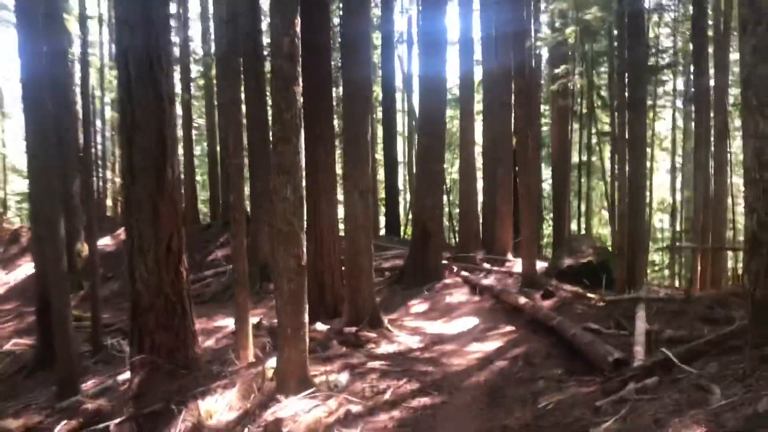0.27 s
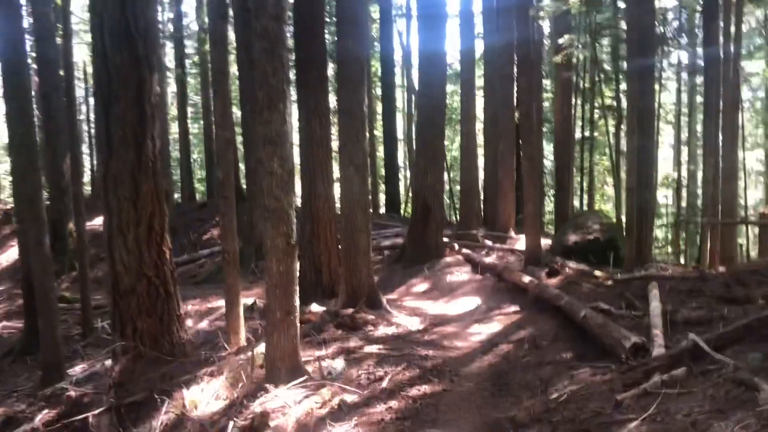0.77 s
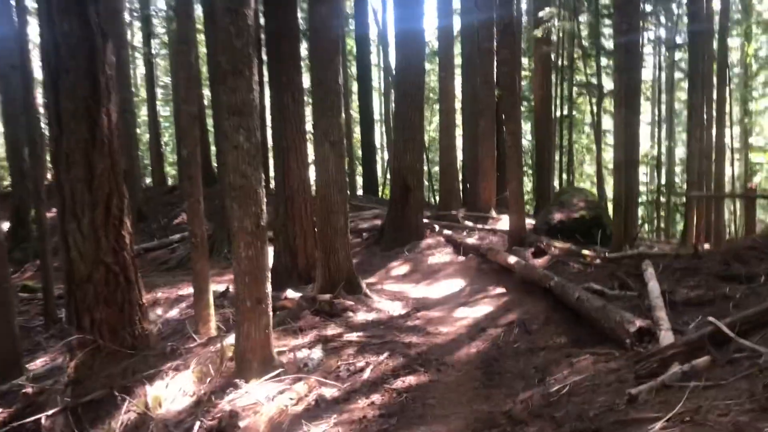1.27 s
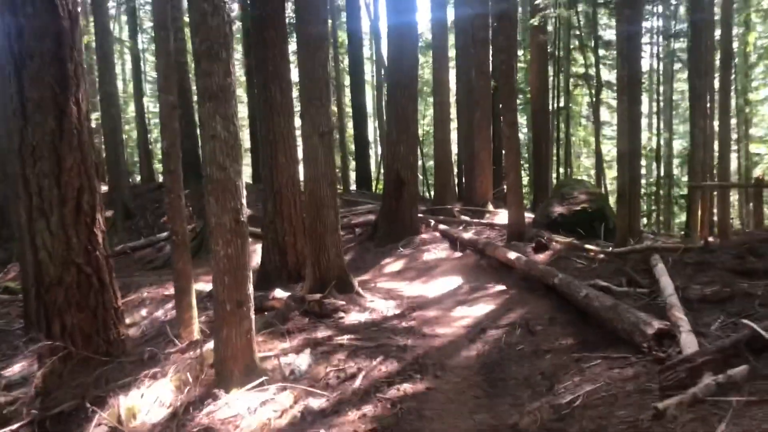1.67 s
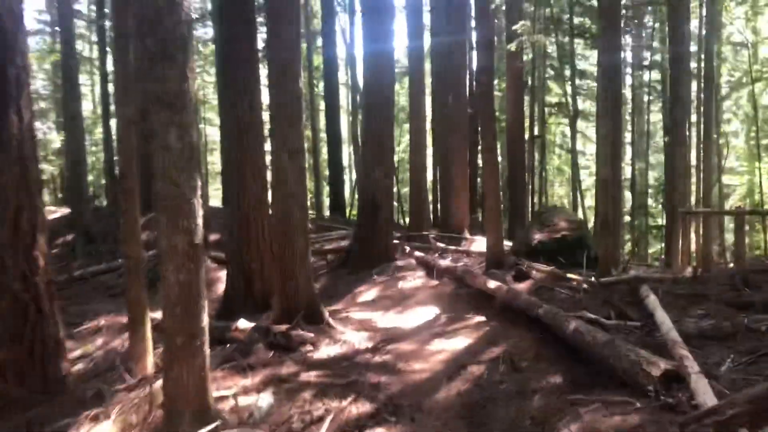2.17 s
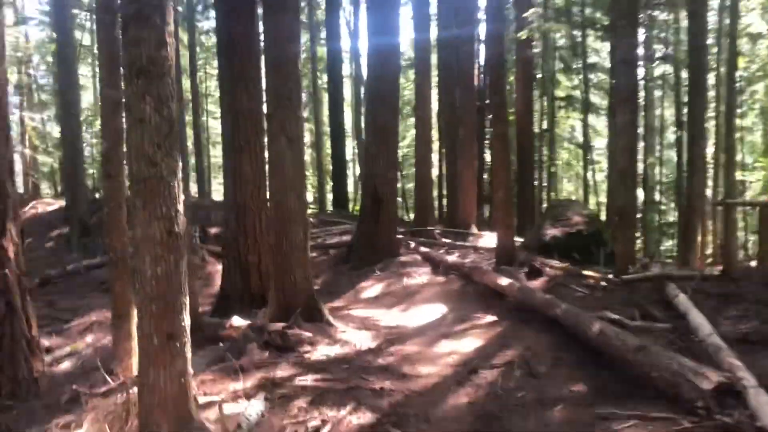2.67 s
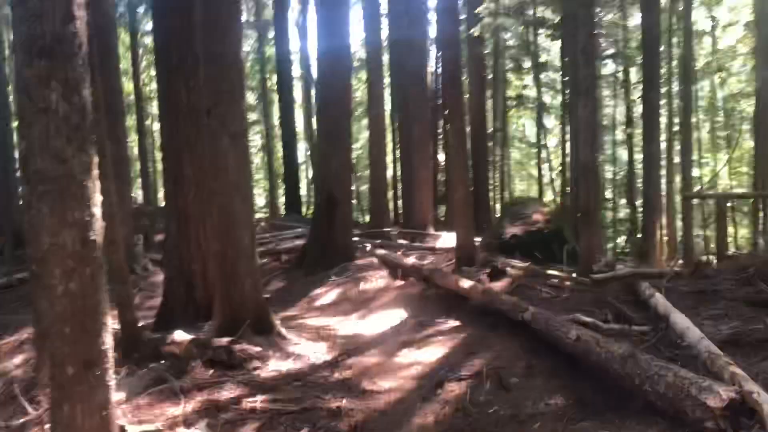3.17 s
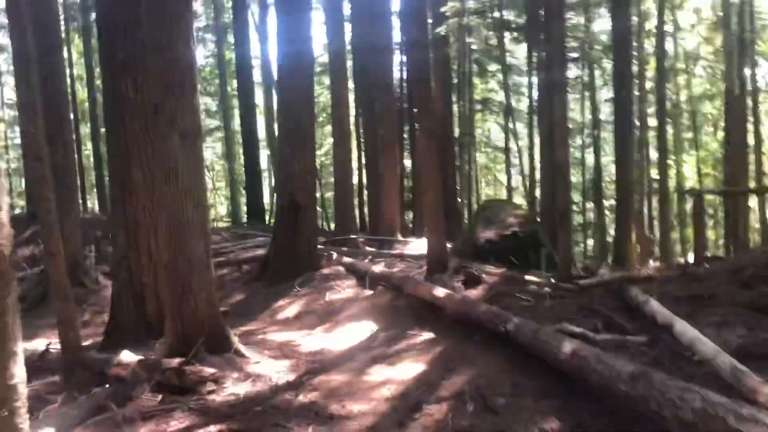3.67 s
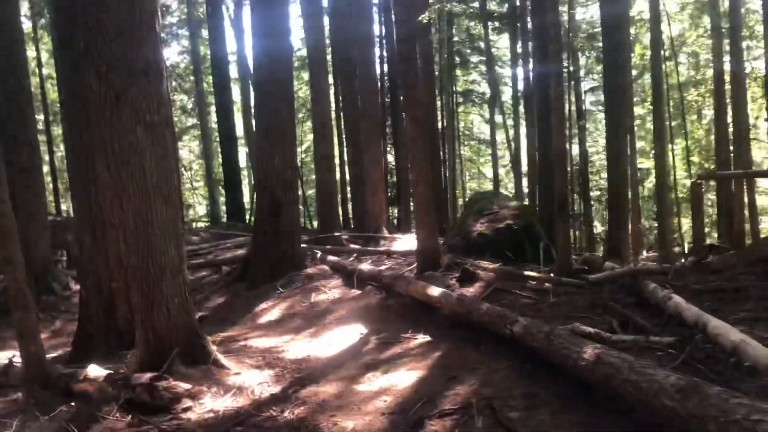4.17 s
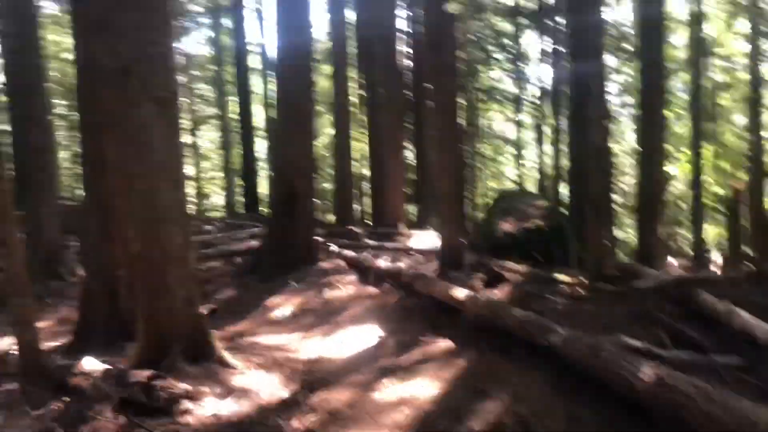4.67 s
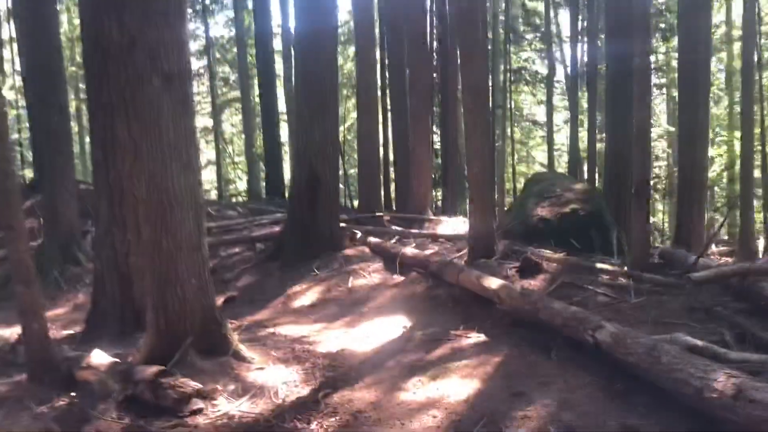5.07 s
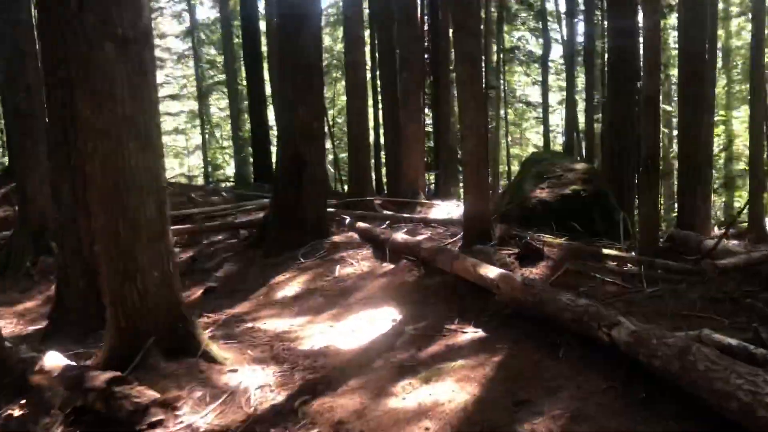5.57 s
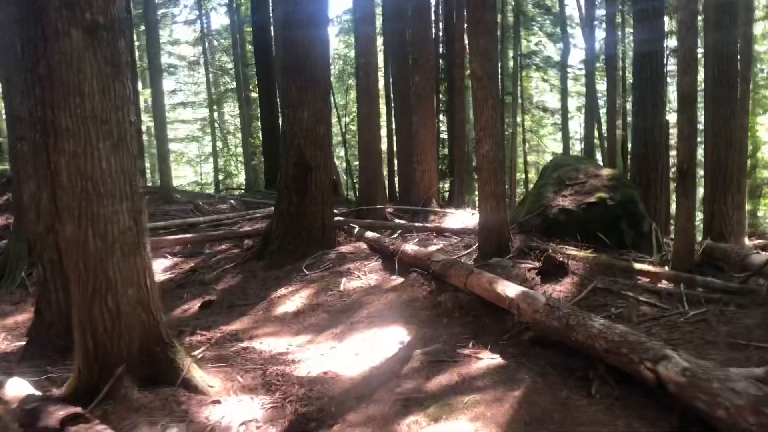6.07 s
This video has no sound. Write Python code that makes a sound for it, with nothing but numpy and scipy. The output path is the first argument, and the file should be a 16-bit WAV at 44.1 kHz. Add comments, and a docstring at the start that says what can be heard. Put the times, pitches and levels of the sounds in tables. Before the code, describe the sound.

Close handling scrapes, thuds and fluttering low air dominate as a walker treads dry dirt, muffled crunches and small twig snaps underneath.

```python
"""Hiker on a dry trail

A dry forest trail, heard at a hand-held camera's microphone: the hand and the moving air are close, the trees faint.
The grip jerks and slides: noise bunched by tiny slips rings in the case. Boots and a few extra crunches are
coloured grains under a swelling weight; twigs are cracks that excite short knocks; loose needles are sparse ticks.
Moving air is turbulence built from pressure pushes, with low fluttering tones; jolts are single pressure pulses."""
import sys
import numpy as np
from scipy import signal
from scipy.fft import rfft, irfft, next_fast_len
from scipy.io import wavfile
from scipy.ndimage import uniform_filter1d

SR = 44100
rng = np.random.default_rng(int(sys.argv[2]) if len(sys.argv) > 2 else 0)


def to_wav(sig):
    """Store sig (one row per channel, or 1-D mono) as 16-bit WAV at the path in sys.argv[1].

    Samples outside -1..1 are clipped; the rate is SR.
    """
    pcm = np.clip(np.atleast_2d(sig), -1, 1) * 32767
    pcm = np.round(pcm).astype(np.int16)
    wavfile.write(sys.argv[1], SR, pcm.T)  # frames by channels


N = 277943  # length [samples]
TIME = np.arange(N) / SR  # [s]


def amp(db):
    """Decibels to gain."""
    return 10 ** (np.asarray(db) / 20)


def unit(x):
    """Scales to rms 1."""
    return x / np.sqrt(np.mean(x ** 2) + 1e-20)


def add(mix, s, sound):
    """Mixes a sound in at time s [s]."""
    start = max(round(s * SR), 0)
    part = mix[start:][:len(sound)]
    part += sound[:len(part)]


def colour(x, points):
    """Minimum-phase (causal) filter with the given spectrum; the result has rms 1."""
    hz, db = np.transpose(points)
    size = next_fast_len(N + 8192)
    bins_hz = abs(np.fft.fftfreq(size, 1 / SR))
    log_gain = np.log(amp(np.interp(np.log(bins_hz + 1), np.log(hz), db)))
    response = np.exp(np.conj(signal.hilbert(log_gain)))  # the phase follows from the log gain
    spectrum = rfft(x, size) * response[:size // 2 + 1]
    return unit(irfft(spectrum, size)[:N])


def wander(rate_hz):
    """Smooth random motion of rms 1, up to about the given rate."""
    hz = np.fft.rfftfreq(N, 1 / SR)
    smoothing = np.exp(-(hz / rate_hz) ** 2)
    return unit(irfft(rfft(rng.standard_normal(N)) * smoothing, N))


def grains(per_s, spread):
    """Sparse clicks of uneven size and random sign, rms 1; spread [dB] sets the unevenness."""
    size_db = spread * np.minimum(rng.exponential(1, N), 4)
    size = amp(size_db) * rng.choice([-1, 1], N)
    return unit(size * (rng.random(N) < per_s / SR))


def steady(x, window):
    """Evens the strength of x over spans longer than the window [s]."""
    count = int(window * SR)
    power = uniform_filter1d(uniform_filter1d(x ** 2, count), count)
    return x / np.sqrt(power + 1e-9)


def swell(growing, easing, db, depth_db, rise, fall):
    """Level of one push: it sets in, grows evenly in dB to its crest, eases off and lets go."""
    length = growing + easing
    t = np.arange(0, length + 8 * fall, 1 / SR)
    level = amp(db + np.interp(t, [0, growing, length], [-depth_db, 0, -depth_db]))
    onset = 1 - np.exp(-t / rise)
    release = np.exp(-np.maximum(t - length, 0) / fall)
    return level * onset * release


# colour of the air among the trees: (frequency [Hz], relative density [dB])
FOREST_COLOUR = [(100, -17.5), (250, -4), (1090, -8.5), (1800, -18.5), (3200, -22.5), (15500, -24.5)]
FOREST_DB = -61.5  # rms level [dB]


def forest():
    """A faint, steady wash of air among the trees, as coloured noise."""
    return amp(FOREST_DB) * colour(rng.standard_normal(N), FOREST_COLOUR)


# colour of loose needles settling: (frequency [Hz], relative density [dB])
DEBRIS_COLOUR = [(400, -9.5), (1700, -4.5), (9000, -25)]


def debris():
    """Loose needles and crumbs tick faintly, in small clusters of coloured grains."""
    clusters = amp(5.2 * wander(6))
    ticks = grains(per_s=160, spread=1.2) * clusters
    return amp(-75) * colour(ticks, DEBRIS_COLOUR)


def eddies(points, window):
    """Turbulence as a train of uneven pressure pushes."""
    pushes = grains(per_s=400, spread=3)
    return steady(colour(pushes, points), window)


# air swells at the microphone as the arm swings:
# (start [s], growing [s], easing [s], level at the crest [dB])
GUSTS = [(0.108, 0.02, 0.2, -30.5), (0.346, 0.27, 0.03, -31.5), (.84, 0.022, 0.11, -41.5),
         (1.233, 0.12, 0.11, -38.5), (1.428, 0.28, 0.015, -40), (1.985, 0.038, 0.065, -34.5),
         (2.187, 0.055, 0.072, -37), (2.444, 0.25, 0.033, -32.5), (2.895, 0.11, 0.082, -40.5),
         (3.248, 0.068, 0.023, -43.5), (3.433, 0.074, 0.012, -44.5), (3.774, 0.011, 0.036, -37.5),
         (4.109, 0.039, 0.068, -36), (4.432, 0.04, 0.014, -35.5), (4.53, 0.27, .035, -30),
         (4.848, 0.053, 0.051, -34), (4.992, 0.092, .1, -36), (5.388, 0.039, 0.08, -32.5),
         (5.508, 0.19, 0.16, -35), (6.155, 0.015, 0.061, -37)]
# colours of weak, strong and deep moving air: (frequency [Hz], relative density [dB])
SOFT_AIR = [(30, -15.5), (70, 4.5), (110, 0.5), (200, -6.5), (2000, -81.5)]
HARD_AIR = [(30, -10), (70, 2), (130, 3), (200, -6.5), (700, -31), (3000, -84.5)]
DEEP_AIR = [(8, -5), (65, -2), (130, -16.5), (400, -64.5)]
GUST_DEPTH_DB = 7  # growth starts and easing ends this far under the crest [dB]
WAKE_DB, WAKE_S = -10, 0.044  # stirred air after each gust: relative level [dB], decay [s]
HARD_FROM_DB = -34.5  # from this flow level [dB] up, the colour is fully hard


def air():
    """Turbulence at the microphone port brightens as it grows; a deep sway of pressure follows it loosely."""
    flow = np.zeros(N)
    for s, growing, easing, db in GUSTS:
        add(flow, s, swell(growing, easing, db, GUST_DEPTH_DB, rise=0.0027, fall=0.0095))
    keep = np.exp(-1 / (WAKE_S * SR))
    wake = amp(WAKE_DB) * signal.lfilter([1 - keep], [1, -keep], flow)
    flow = np.maximum(flow, wake)

    hard = np.clip(flow / amp(HARD_FROM_DB), 0, 1)
    soft_eddies = eddies(SOFT_AIR, window=0.055)
    hard_eddies = eddies(HARD_AIR, window=0.07)
    buffet = np.sqrt(1 - hard) * soft_eddies + np.sqrt(hard) * hard_eddies

    slow_flow = uniform_filter1d(flow, size=4000)  # averaged over about 0.09 s
    sway = amp(-46.0) + amp(-5.5) * np.minimum(slow_flow, amp(-42.0))
    lumps = amp(-63.0 + 6.5 * wander(27))  # small puffs, also between the gusts
    return (flow + lumps) * buffet + sway * eddies(DEEP_AIR, window=0.6)


# the hand slides along the case, pressing harder, then easing:
# (start [s], growing [s], easing [s], level at the crest [dB])
SLIDES = [(.001, 0.03, 0.045, -35), (.315, 0.054, 0.071, -38), (0.447, 0.019, 0.073, -42.5),
          (.525, .025, 0.036, -35), (0.904, 0.085, 0.047, -37.5), (1.041, 0.0092, 0.038, -32.5),
          (1.097, 0.025, .012, -37), (1.347, .004, 0.047, -45), (1.477, 0.053, 0.0061, -41.5),
          (2.136, .0035, 0.034, -49), (2.415, 0.036, .068, -41.5), (2.542, 0.063, .006, -40.5),
          (2.605, 0.037, 0.022, -33), (2.995, 0.068, 0.008, -37), (3.202, 0.039, 0.0079, -32),
          (3.64, 0.0066, .03, -36.5), (4.75, 0.016, .011, -37.5), (5.082, 0.052, 0.011, -36),
          (5.154, .014, 0.018, -34.5), (5.189, 0.0075, 0.052, -36), (5.255, 0.022, 0.023, -37),
          (5.543, 0.021, .005, -45), (5.659, 0.017, 0.067, -42.5), (5.74, 0.049, 0.019, -47)]
# the grip slips with a short jerk: (time [s], length [s], level at the bite [dB])
JERKS = [(.110, 0.017, -29.5), (0.218, 0.01, -31.5), (0.296, 0.015, -44), (0.845, .015, -27),
         (1.308, 0.012, -37.5), (1.417, .007, -37), (1.623, 0.0088, -33.5), (1.976, .015, -41),
         (2.125, 0.0085, -28.5), (2.407, 0.0053, -26), (2.678, 0.015, -33), (2.96, 0.018, -31),
         (3.085, .024, -34.5), (3.152, .019, -33.5), (3.249, .002, -37), (3.433, .019, -37),
         (3.513, 0.013, -35), (3.606, 0.012, -45.5), (4.482, 0.012, -34), (4.668, 0.0089, -43),
         (4.722, 0.017, -37), (5.0277, 0.014, -28), (5.07, .003, -34), (5.524, 0.0065, -38),
         (5.577, .019, -38), (5.628, 0.0099, -48), (6.2061, 0.011, -24)]
# colours of the case, the case gripped tightly, and the dull rubbing:
# (frequency [Hz], relative density [dB])
CASE_RING = [(3300, -31.5), (4000, -21), (4700, -2.5), (5300, -1.5), (5900, -11.5), (6500, -8.5),
             (7300, -22.5), (8400, -29), (9500, -13), (11500, -4), (12900, 3.5), (14100, -1.5), (15100, -1),
             (15700, 2.5)]
TIGHT_CASE_RING = [(3900, -30.5), (5300, -6), (6400, -4.5), (8000, -25), (9300, -11), (12800, -12),
                   (15200, 3.5)]
DULL_RUB = [(500, 4), (1300, -9), (4500, -27), (16000, -13)]
TIGHT_AT, TIGHT_FOR = 0.94, 0.23  # the grip tightens, the hiss moves up: centre [s], 1/e half width [s]
SLIDE_DEPTH_DB, JERK_DROP_DB = 8.5, 7  # slide ends under the crest [dB]; a jerk's easing [dB]
DRAG_DB = 2.5  # skin drags unevenly: rms of the level wander [dB]
SLIPS_PER_S, SLIP_S = 650, 0.0006  # rate of single slips [1/s], decay of each [s]
SMOOTH_DRAG = 0.62  # even rubbing between slips, relative to the rms of the bursts


def grip():
    """Tiny slips crackle in sharp, uneven bursts and ring the case; a dull part passes straight through."""
    sliding, jerking = np.zeros(N), np.zeros(N)
    for s, growing, easing, db in SLIDES:
        add(sliding, s, swell(growing, easing, db, SLIDE_DEPTH_DB, rise=0.00013, fall=0.0025))
    for s, length, db in JERKS:
        add(jerking, s, swell(0, length, db, JERK_DROP_DB, rise=0.00034, fall=0.0022))
    pressure = jerking + sliding * amp(DRAG_DB * wander(75))

    slip_decay = np.exp(-1 / (SLIP_S * SR))
    bursts = signal.lfilter([1], [1, -slip_decay], abs(grains(per_s=SLIPS_PER_S, spread=1.8)))
    bunching = steady(SMOOTH_DRAG + unit(bursts), window=.008)
    slips = bunching * rng.standard_normal(N)

    tight = np.exp(-((TIME - TIGHT_AT) / TIGHT_FOR) ** 4)
    loose_ring = np.sqrt(1 - tight) * colour(slips, CASE_RING)
    tight_ring = np.sqrt(tight) * colour(slips, TIGHT_CASE_RING)
    dull = colour(rng.standard_normal(N) * bunching, DULL_RUB)
    return pressure * (loose_ring + tight_ring + amp(-17.5) * dull)


# crunches on the ground: soles rolling about twice a second, with a few extra crunches between
# (time at full weight [s], level [dB], share of grit [0-1])
CRUNCHES = [(0.039, -51, 0.58), (1.088, -50.5, 0), (1.611, -55, 0.53), (2.134, -51, 0.1), (2.655, -58, 0.4),
            (3.183, -52, 0.5), (3.662, -51, 0.1), (4.19, -61, 1), (4.468, -52.5, 0.13), (4.73, -54.5, 0.27),
            (5.059, -45, 0.67), (5.765, -52, 1), (6.285, -51, 0.9)]
# colours of fine dirt and of small stones on the ground: (frequency [Hz], relative density [dB])
DIRT_COLOUR = [(200, -16.5), (500, 2.5), (800, -4.5), (1300, -3), (1750, -16), (2500, -15.5), (8000, -34)]
GRIT_COLOUR = [(300, -3), (700, -5.5), (1150, 1.5), (1600, -5), (3200, -39), (8000, -39)]
LOAD_S, UNLOAD_S = 0.018, 0.022  # weight coming on and going off: time from half to full [s]
ROLL_SHAPE = 2.15  # a higher shape is squarer


def ground():
    """Fine dirt crushes and coarser grit crunches, muffled, as weight comes on and goes off."""
    on_dirt, on_grit = np.zeros(N), np.zeros(N)
    for s, db, share in CRUNCHES:
        half_time = np.where(TIME < s, LOAD_S, UNLOAD_S)
        weight = amp(db) / (1 + (abs(TIME - s) / half_time) ** ROLL_SHAPE)
        share = np.clip(share, 0, 1)
        on_dirt += np.sqrt(1 - share) * weight
        on_grit += np.sqrt(share) * weight
    dirt_grains = grains(per_s=1700, spread=3.4) * amp(10.0 * wander(52))
    crush = steady(colour(dirt_grains, DIRT_COLOUR), window=0.073)
    crunch = steady(colour(grains(per_s=700, spread=4.9), GRIT_COLOUR), window=0.043)
    return on_dirt * crush + on_grit * crunch


# needles and twigs breaking underfoot: (time [s], peak level [dB], knock pitch [Hz])
SNAPS = [(.192, -39, 550), (.292, -39, 1020), (1.263, -45.5, 1900), (1.649, -43.5, 1700),
         (2.372, -44.5, 2600), (2.829, -38, 4100), (3.1835, -32.5, 1040), (3.666, -45, 1070),
         (5.005, -37.5, 1080), (5.042, -38, 1490), (5.0665, -28.5, 1080), (5.074, -31, 1110),
         (5.754, -40, 1290), (6.2723, -35, 990)]


def twigs():
    """Each break is a crack and a quick run of smaller splinters, all knocking briefly against the soil."""
    out, t = np.zeros(N), np.arange(1500) / SR
    for s, db, hz in SNAPS:
        cycles = hz * t
        knock = np.sin(2 * np.pi * cycles) * cycles ** 3 * np.exp(-cycles / .22)
        splinters = rng.random(len(t)) < 2000 / SR
        cracks = splinters * rng.uniform(-.7, .7, len(t)) * np.exp(-t / .002)
        cracks[0] = 1  # the first, full crack
        snap = signal.fftconvolve(cracks, knock)
        add(out, s, amp(db) * snap / abs(snap).max())
    return out


# jolts that reach the microphone:
# (time [s], level of the narrow push before its rebound is taken off [dB], its 1/e half width [s])
THUMPS = [(.243, -22.5, 0.0093), (1.3098, -29, 0.00016), (1.312, -30, 0.0036), (1.368, -19.5, 0.0022),
          (2.709, -14.5, 0.0029), (3.313, -24.5, 0.0019), (3.784, -30.5, 0.0016), (4.165, -18, 0.0043),
          (4.318, -25, .002), (4.582, -17.5, .0026), (4.648, -16.5, 0.0023), (4.711, -18.5, 0.0044),
          (5.064, -12, 0.0011), (5.082, -20, 0.0045), (5.409, -26.5, .00061), (5.716, -25, 0.0016),
          (5.837, -21, 0.0026), (6.174, -19.5, 0.0026)]


def jolts():
    """A push of pressure with a rebound on either side: a narrow pulse less a wider, weaker one."""
    out = np.zeros(N)
    for s, db, width in THUMPS:
        u = (TIME - s) / width
        near = abs(u) < 8
        push = np.exp(-u[near] ** 2)
        rebound = .5 * np.exp(-(u[near] / 2) ** 2)
        out[near] -= amp(db) * (push - rebound)
    return out


# gusts that flutter at a pitch, one list of points each:
# (time [s], pitch before wobble [Hz], rms level of the fundamental [dB])
FLUTTERS = [
    [(.4, 98.5, -30), (.495, 144.1, -30), (.52, 90.8, -25.5), (.55, 155.7, -25.5), (.59, 136, -22.5),
     (.622, 117, -29)],
    [(2.565, 85, -39), (2.62, 106.6, -31), (2.65, 90.9, -33), (2.69, 153, -27)],
]


def flutter():
    """Eddies shed almost regularly: a wobbling low tone with weak overtones."""
    out, wobble = np.zeros(N), wander(73)
    for rows in FLUTTERS:
        s, hz, db = np.transpose(rows)
        on = (TIME > s[0]) & (TIME < s[-1])
        pitch = np.interp(TIME[on], s, hz) * (1 + 0.074 * wobble[on])
        phase = 2 * np.pi * np.cumsum(pitch) / SR
        tone = np.sin(phase) + amp(-18.5) * np.sin(2 * phase) + amp(-23.5) * np.sin(3 * phase)
        level = amp(np.interp(TIME[on], s, db))
        fade = signal.windows.tukey(on.sum(), .12)
        out[on] += np.sqrt(2) * tone * level * fade
    return out


def scene():
    """Everything, heard at the hand-held microphone."""
    surroundings = forest() + debris() + air()
    handling_and_steps = grip() + ground() + twigs() + jolts() + flutter()
    return (surroundings + handling_and_steps)[None]


EDGE_HZ = 15900  # upper band edge [Hz]


def record(dry):
    """The recorder's band limit, a linear-phase low-pass."""
    low_pass = signal.firwin(401, EDGE_HZ, window=("kaiser", 8), fs=SR)
    return signal.oaconvolve(dry, low_pass[None], "same")


dry = scene()
out = record(dry)
to_wav(out)
```